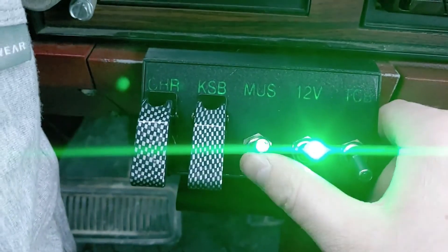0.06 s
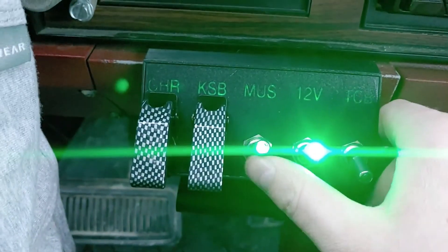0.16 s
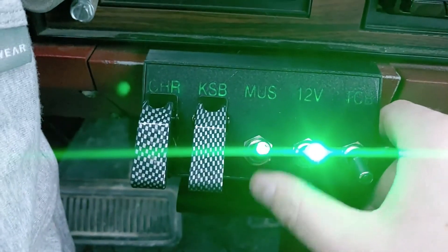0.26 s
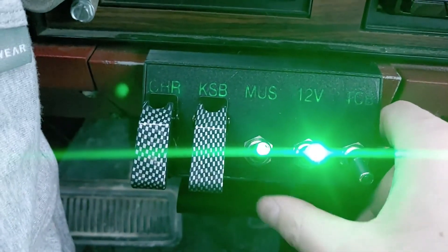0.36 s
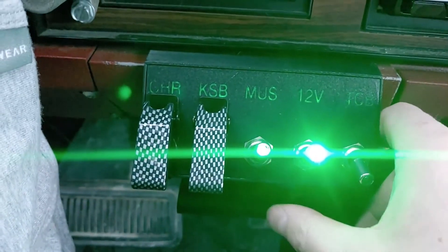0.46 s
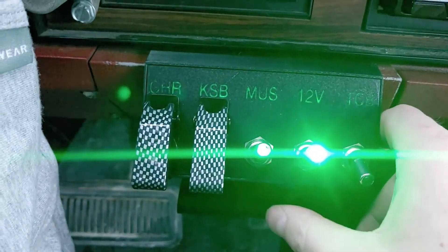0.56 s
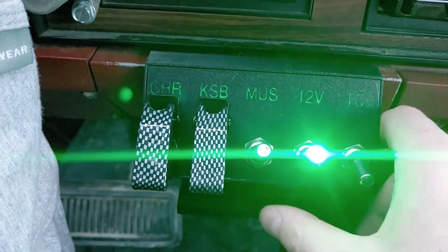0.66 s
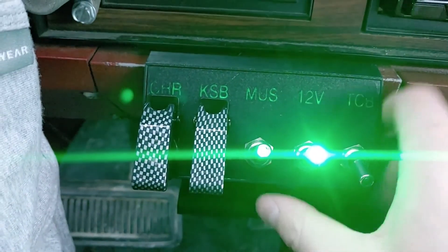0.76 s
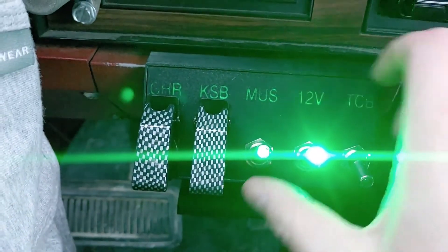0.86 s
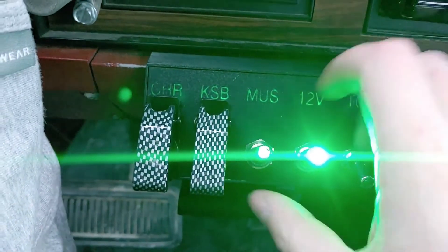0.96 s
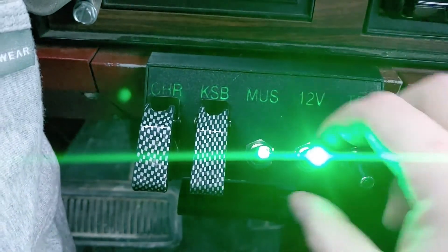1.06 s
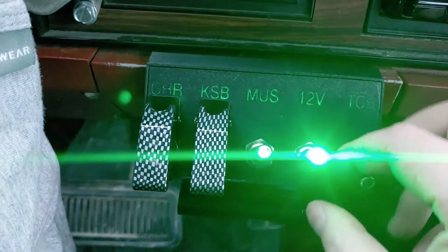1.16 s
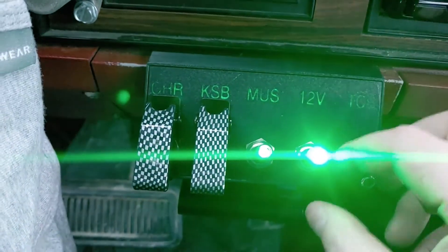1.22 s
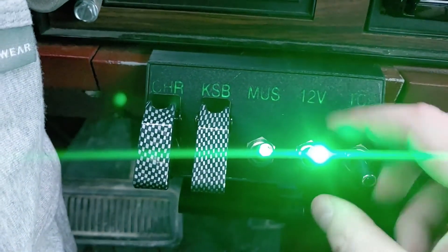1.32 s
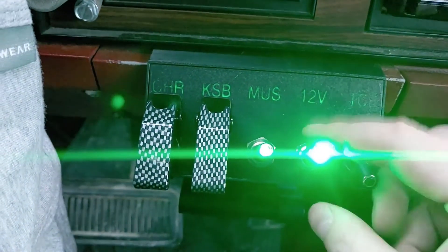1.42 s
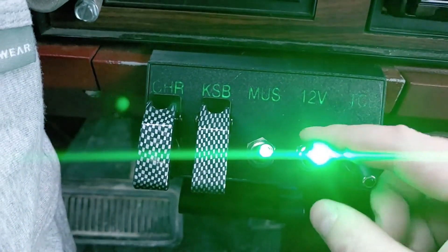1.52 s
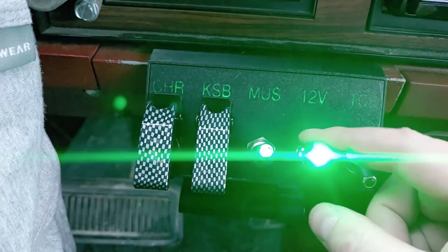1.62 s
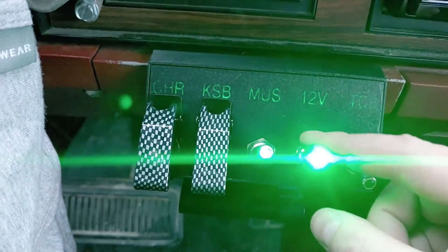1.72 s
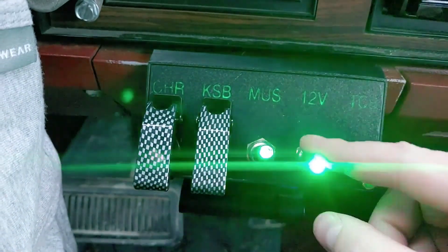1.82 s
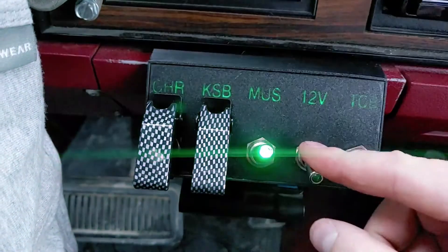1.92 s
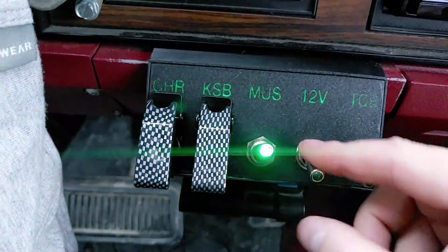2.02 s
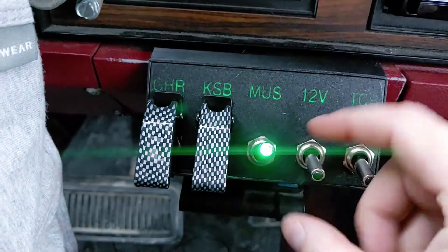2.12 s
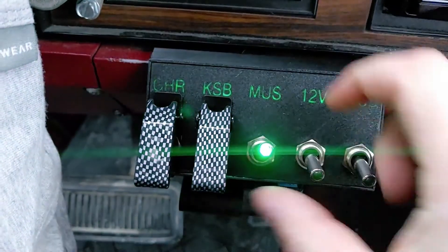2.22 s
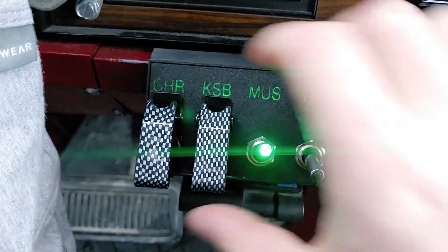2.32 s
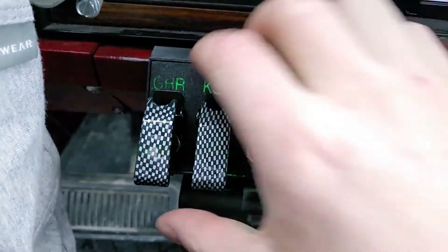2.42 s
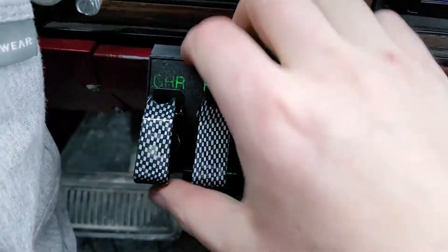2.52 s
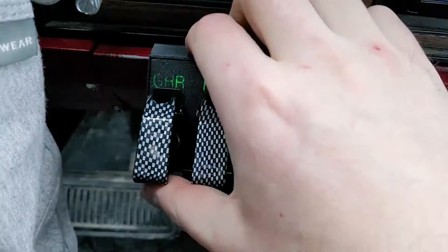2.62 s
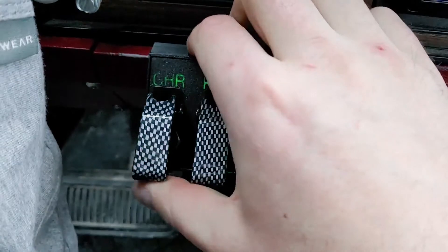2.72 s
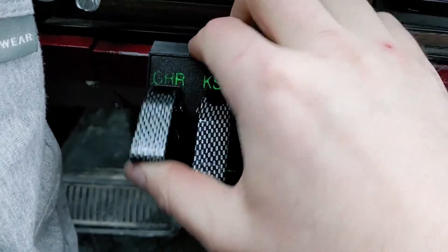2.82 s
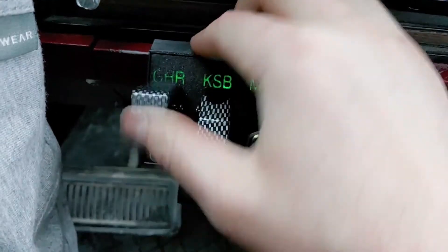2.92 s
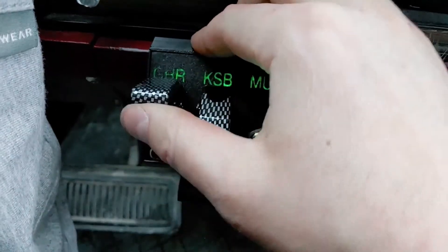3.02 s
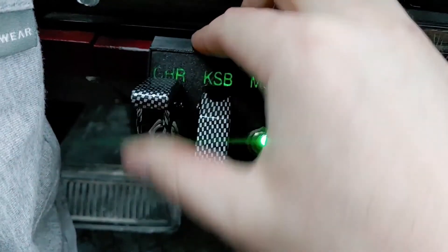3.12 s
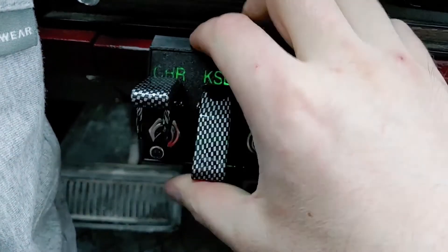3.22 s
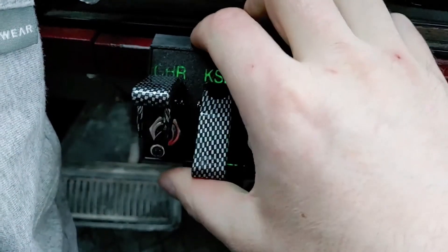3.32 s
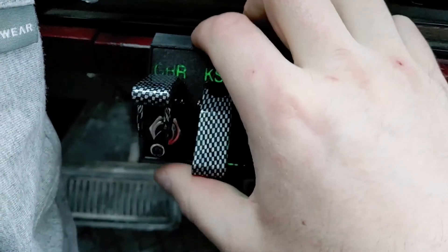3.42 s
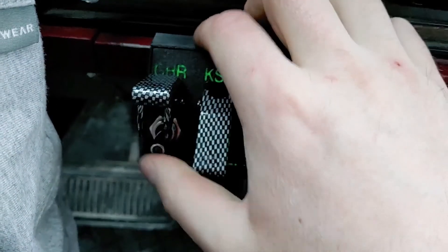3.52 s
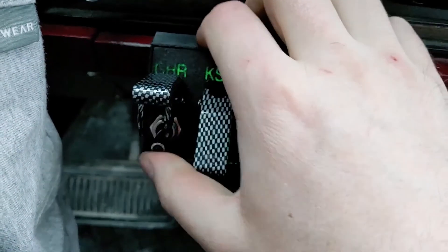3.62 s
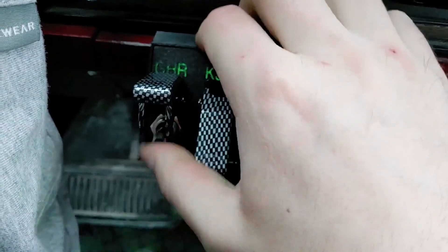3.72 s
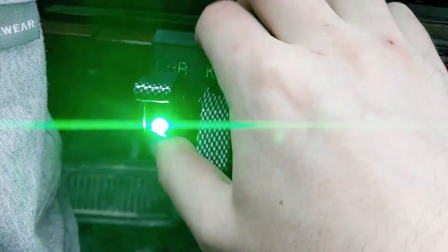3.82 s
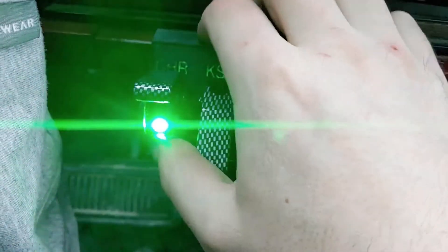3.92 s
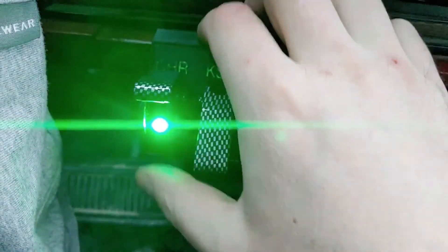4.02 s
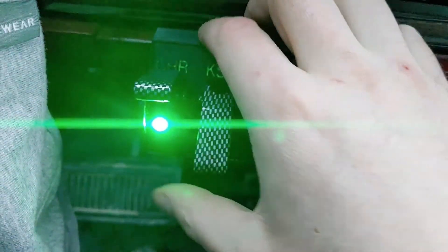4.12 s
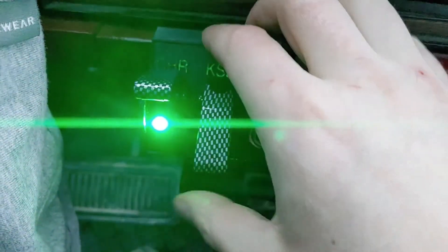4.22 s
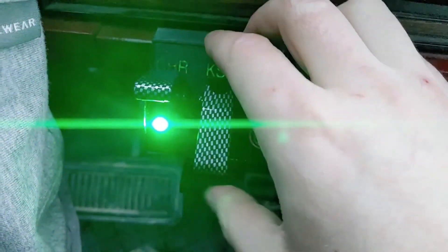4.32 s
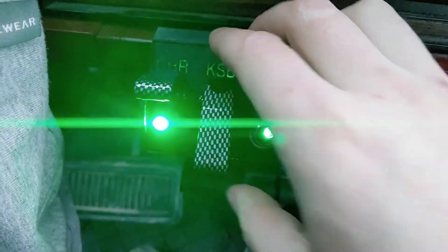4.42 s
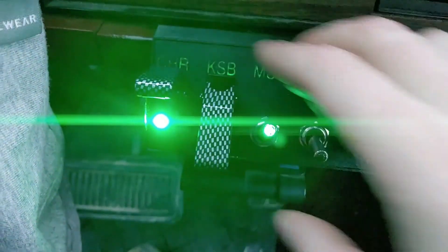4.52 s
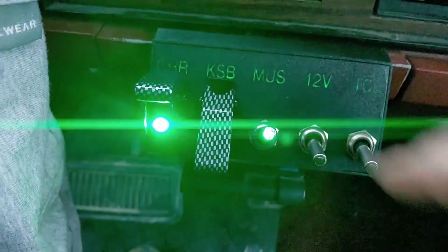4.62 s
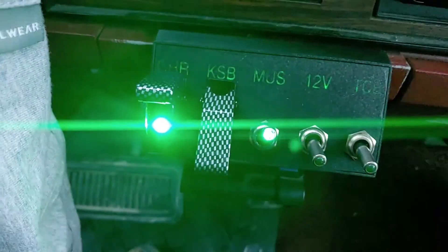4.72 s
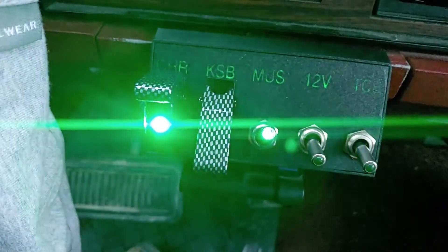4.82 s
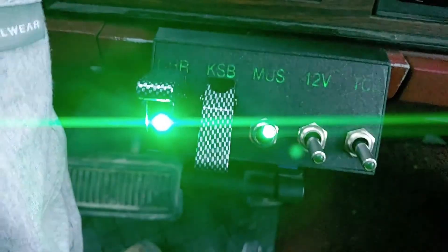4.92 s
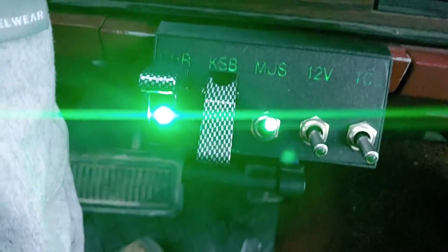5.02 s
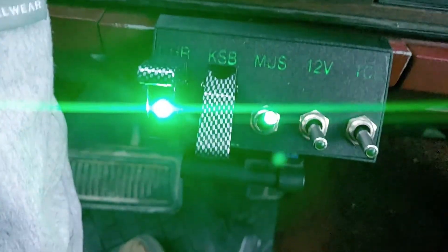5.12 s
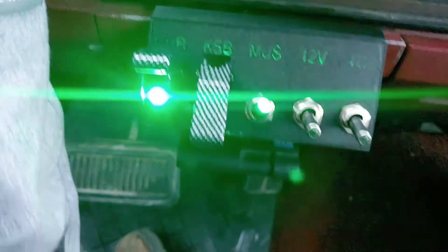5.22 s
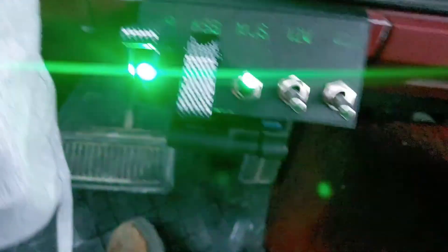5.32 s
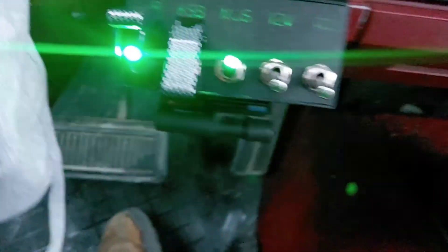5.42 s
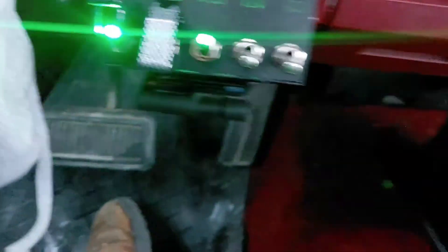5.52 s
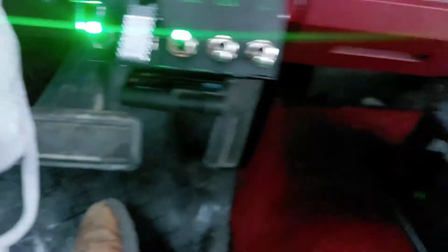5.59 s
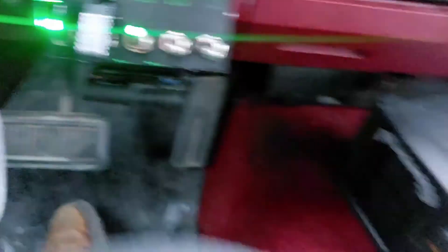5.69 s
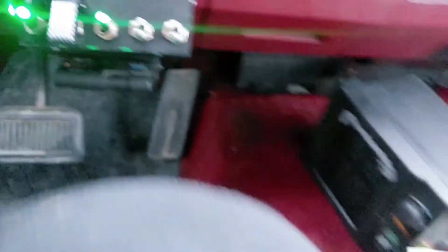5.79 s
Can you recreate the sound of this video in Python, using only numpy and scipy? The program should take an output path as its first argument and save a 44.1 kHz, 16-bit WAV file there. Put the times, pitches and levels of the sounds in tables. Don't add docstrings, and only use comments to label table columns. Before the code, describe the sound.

Small levers click and clack inside a vehicle cab while a fan rumbles and gusty air thumps hard against the right microphone.

```python
import sys
import numpy as np
from scipy import signal
from scipy.io import wavfile
from scipy.ndimage import uniform_filter1d

SR = 44100
rng = np.random.default_rng(int(sys.argv[2]) if len(sys.argv) > 2 else 0)


def convert_level_to_amplitude(level_db):
    exponent = np.asarray(level_db, float) / 20
    return 10 ** exponent


def store_pcm(level_fs):
    pcm = np.round(np.clip(level_fs, -1, 1) * 32767).astype(np.int16)
    wavfile.write(sys.argv[1], SR, np.atleast_2d(pcm).T)


N = 258189

# start_s, peak_db, left_minus_right_db, chatter_s, tail_db
SNAPS = [
    (.0096, -14.5, 7, 0.0011, -31),
    (1.8729, -6.5, 3.5, 0.00048, -24),
    (2.9517, -16.5, 6, 0.0022, -35),
    (3.7752, -14, 8.5, 0.0049, -30.5),
]
# pitch_hz, width_hz, level_db
PANEL_MODES = [
    [(690, 1060, 4), (1304, 115, 1), (2210, 420, -16), (3000, 470, 5.5), (3700, 470, 3.5), (4280, 930, -11),
     (7340, 740, -5), (10000, 3700, 2), (11200, 730, 2.5), (13200, 590, -7)],
    [(642, 270, -12), (1226, 160, -8.5), (2090, 170, -4), (3050, 300, -1), (3430, 450, 2), (4480, 550, -3),
     (6930, 550, -10), (8080, 500, -3), (10000, 900, -2.5), (13600, 1500, -5)],
    [(552, 150, -6), (1200, 290, 5), (1770, 300, -9), (2500, 410, -13), (3260, 750, -12), (4270, 320, -6.5),
     (7000, 580, -24), (9300, 1100, -14), (11850, 700, -17), (14500, 900, -34)],
    [(700, 450, -15.5), (1210, 1000, -2), (1816, 200, -6.5), (2400, 1200, -7.5), (3420, 600, -5.5),
     (4000, 740, -6.5), (6800, 2400, -15), (9100, 2500, -4), (11600, 1100, -6), (14600, 900, -31)],
]
# pitch_hz, level_db (per Hz)
CAB_TAIL = [(410, -45.5), (700, 2.5), (2160, -1.5), (4300, -10.5), (5430, -35.5), (6340, -12),
            (9980, -23.5), (11200, -32), (13800, -18.5), (15500, -42)]
# start_s, tick_db, thump_db, thump_hz
KNOCKS = [
    (1.2231, -13, -15, 300),
    (5.2574, -14.5, -12.5, 310),
]
# start_s, level_db, centre_hz, length_s
TOUCHES = [(0.77, -49, 1220, 0.053), (0.794, -46, 2220, 0.019), (0.785, -62, 8900, 0.051),
           (1.145, -57, 11000, .011), (1.23, -46.5, 2500, 0.0081), (2.565, -51, 2780, 0.0088),
           (2.699, -46.5, 6100, 0.0007), (2.821, -68, 4400, .01), (3.547, -57, 3370, 0.0037),
           (3.805, -43, 1840, 0.019), (4.245, -68.5, 5000, 0.017), (4.484, -66, 5460, 0.046),
           (4.798, -69, 6000, 0.01), (4.989, -56, 10000, 0.0015), (5.076, -72, 6500, 0.0088),
           (5.258, -54, 2520, 0.011), (5.836, -57.5, 2400, 0.013)]
# start_s, rustle_db
SLEEVE = [(0.0, -80), (.7, -75.5), (.95, -76), (1.76, -74.5), (1.92, -79), (2.14, -80.5), (2.45, -68),
          (2.75, -76.5), (3.4, -75.5), (3.9, -78.5), (4.4, -73), (5.85, -71)]
# pitch_hz, level_db (per Hz)
RUSTLE_COLOUR = [(1500, -11), (2300, -13.5), (4600, -1.5), (6800, 2.5), (9500, 0.5), (12500, 5.5),
                 (15500, -2.5)]
# front_s, hold_s, buffeting_db, leading_eddy_peak_db
GUSTS = [(0.057, 0.014, -13.5, -3.8), (0.2743, 0.034, -18.5, -2), (0.4212, 0.026, -16, -5.5),
         (0.512, 0.063, -21, -18), (0.661, 0.05, -17, 2.5), (.7653, 0.17, -18.5, -4),
         (1.051, 0.1, -15, -2.5), (1.2374, 0.08, -17.5, -7.5), (1.4746, .02, -17, -0.2),
         (1.5454, 0.094, -16, -1.5), (1.735, .015, -14.5, 2.1), (1.799, 0.042, -19.5, 2.3),
         (1.86, .085, -23.5, -21), (2.0764, .6, -22.5, -3), (2.3619, .03, -11.5, 1.3),
         (2.7219, .03, -17.5, -2), (2.8374, .58, -18.5, -4), (3.2912, 0.08, -20, 0.8),
         (3.544, .06, -14.5, 2.8), (3.473, .6, -24, -0.5), (4.109, .05, -22.5, -4.5),
         (4.218, 0.12, -19.5, -4), (4.4083, 0.019, -14, -1.9), (4.5908, .015, -24, -2),
         (4.642, .07, -23, -8), (4.8244, 0.07, -20, -4.5), (5.052, 0.076, -17.5, -6.5),
         (5.222, .31, -21, -25), (5.4498, 0.014, -14.5, 2.5), (5.618, 0.014, -24.5, -6.5)]
# start_s, peak_db, fastest_swing_hz
EDDIES = [(.1369, -6, 229), (.69, 1.4, 186), (1.0752, 2.5, 328), (1.1103, 0.3, 323), (1.2598, -3, 165),
          (1.3046, -6, 289), (1.5843, -1.5, 208), (1.6184, -4.5, 393), (2.2894, -5, 274),
          (2.3927, -12.5, 247), (2.4636, -6.5, 201), (2.5557, 0.7, 110), (2.7385, -4.5, 326),
          (2.9296, -1.5, 203), (3.0159, -6.5, 255), (3.0526, -0.9, 308), (3.0889, .1, 203),
          (3.1326, -5.5, 195), (3.1466, .6, 194), (3.1994, -2, 177), (5.2839, 1.2, 168),
          (1.9083, -0.5, 240), (3.3735, -2.5, 218), (3.7087, -3, 238), (3.5794, 3, 239), (3.5974, -1, 288),
          (3.9196, -3, 172), (4.2427, 1, 155), (5.361, -7.5, 397), (5.4971, -2.1, 272)]
# pitch_hz, level_db (per Hz)
DRAUGHT_COLOUR = [(15, -43), (25, -3.5), (65, 8.5), (233, -6), (319, -14.5), (415, -23.5), (532, -25.5),
                  (1180, -59.5), (1300, -60), (1690, -76), (2860, -120)]
# pitch_hz, left_db (per Hz), right_db (per Hz)
BLOWER_COLOUR = [(33, -63, -64), (52, -66.5, -59), (70, -52.5, -53), (112, -58, -45), (197, -66, -65.5),
                 (316, -65, -65), (404, -69, -69.5), (590, -69.5, -73.5), (705, -76.5, -75.5),
                 (1350, -81, -78.5), (2400, -83.5, -89.5), (3640, -91.5, -95), (5000, -101, -103),
                 (7000, -109, -109)]
# pitch_hz, likeness (-1 to 1)
BLOWER_LIKENESS = [(60, 1), (640, 0.76), (1400, -0.58), (3100, 0.1), (7000, -0.15)]
# start_s, level_db
RUMBLE = [(0.0, -31.5), (1.4, -33), (2.4, -35), (3.55, -31.5), (4.1, -36.5), (5.0, -35), (5.85, -39.5)]
# pitch_hz, width_hz, level_db
CAB_MODES = [(84, 14, 4), (150, 47, -4.5), (229.7, 27, 8), (415, 34, 1.5), (476.6, 120, -1.5)]
# pitch_hz, level_db
WHINE = [(2455, -78.5), (3677, -79.5)]
# pitch_hz, width_hz, share_added (ratio, below zero is a dip)
PORT_COLOUR = [
    [(6570, 380, 0.92), (7770, 860, -1.2), (11300, 2900, -1.2), (12400, 700, 0.41)],
    [(6860, 550, 0.45), (7460, 600, -.3), (10850, 4600, -1.2), (12100, 780, 0.5)],
]


def snaps():
    out = np.zeros((2, N))
    t = np.arange(-180, 6000) / SR
    after_s = np.maximum(t, 0)
    t60 = 0.073
    for (s, peak_db, pan_db, chatter_s, tail_db), modes in zip(SNAPS, PANEL_MODES):
        ring, after = np.zeros((2, 2, len(t)))
        for hz, width_hz, mode_db in modes:
            contact = lever_contact(t, hz, chatter_s)
            mode = resonance(contact, hz, width_hz)
            ring += convert_level_to_amplitude(mode_db) * mode / np.abs(mode).max(axis=1, keepdims=True)
            hum = rms_one(resonance(rng.standard_normal((2, len(t))), hz, 0.53 * width_hz))
            after += convert_level_to_amplitude(0.77 * mode_db - 6 - 12 * hz / 3900 * after_s / t60) * hum
        tail = 0
        for hz, band in bands(rng.standard_normal((2, 2, len(t))), 592, count=14):
            band_db = at_hz(CAB_TAIL, hz) - 3.5 - 25 * hz / 19000 * after_s / t60
            tail = tail + convert_level_to_amplitude(band_db) * band / band.std() * np.sqrt(hz / 2000)
        build_up = 1 - np.exp(-after_s / 0.0052)
        tail = (tail + after) * build_up * convert_level_to_amplitude(tail_db - 60 * (after_s / t60) ** 1.28)
        add(out, sides(pan_db) * (convert_level_to_amplitude(peak_db) * ring + tail), s + t[0])
    return out


def lever_contact(t, hz, chatter_s):
    turn, shift = rng.random(2)
    shake = np.sin(2 * np.pi * (hz * t + turn - np.array([[0], [0.5 * shift]])))
    shared, left, right = rng.standard_normal((3, len(t)))
    rough = shake + 2 * (shared + 0.5 * np.array([left, right]))
    slip = 0.006 * np.exp(t / 0.0012) * (t < 0)
    late = np.maximum(t - min(2600 / hz ** 2, 0.0018), 0) / (chatter_s + 1.12 / hz)
    contact = rough * (slip + late * np.exp(-late * 3.74))
    return contact + 0.2 * np.roll(contact, round(0.0033 * SR), axis=1)


def knocks():
    out = np.zeros(N)
    t = np.arange(1300) / SR
    for s, tick_db, thump_db, thump_hz in KNOCKS:
        from_peak = t - 0.0006
        tick = np.cos(2 * np.pi * 2400 * from_peak) * np.exp(-(from_peak / 0.00028) ** 2)
        grit = 0.12 * rng.standard_normal(len(t)) * np.exp(-t / 0.0056)
        shell = resonance(tick + grit, 1700, 1800)
        add(out, convert_level_to_amplitude(tick_db) * (tick + 0.32 * shell), s - 0.0003)
        push = (t / 0.0011) ** 2 * np.exp(-t / 0.0006)
        push += 0.15 * np.minimum(t / 0.001, 1) * np.exp(-t / 0.003)
        slowing_swing = np.sin(2 * np.pi * thump_hz * np.sqrt(t * 0.0045))
        add(out, -convert_level_to_amplitude(thump_db + 10.5) * slowing_swing * push, s)
    return out * [[1], [0.04]]


def touches():
    out = np.zeros((2, N))
    t = np.arange(-2200, 2200) / SR
    for s, level_db, hz, length_s in TOUCHES:
        white = rng.standard_normal((2, len(t)))
        broad = rms_one(resonance(resonance(white, hz, 1.2 * hz), hz, 0.65 * hz))
        pitched = rms_one(resonance(white, hz, 0.054 * hz))
        swell = np.exp(-0.5 * (t / length_s) ** 2)
        add(out, convert_level_to_amplitude(level_db) * sides(3.7) * (broad + 0.5 * pitched) * swell, s + t[0])
    return out


def gusts():
    rise_db_per_s, fall_db_per_s, lull_db = 439, 402.5, -52
    t = np.arange(N) / SR
    power = convert_level_to_amplitude(2 * lull_db)
    for s, hold_s, level_db, _ in GUSTS:
        away_db = rise_db_per_s * np.maximum(s - t, 0) + fall_db_per_s * np.maximum(t - s - hold_s, 0)
        power = power + convert_level_to_amplitude(2 * (level_db - away_db))
    return 10 * np.log10(power)


def buffeting(brighten, lumpy_db):
    gust_db = gusts()
    swing_db = gust_db - gust_db.mean() + lumpy_db * np.minimum(drift(21), 1.1)
    out = 0
    for hz, band in bands(rng.standard_normal((2, N)), 21.2, count=18):
        extra_db = brighten * np.log2(hz / 90) * swing_db + 2.8 * drift(27)
        out = out + convert_level_to_amplitude(at_hz(DRAUGHT_COLOUR, hz) + extra_db) * band
    out = out / np.sqrt(uniform_filter1d(out ** 2, size=6000) + 1e-20)
    return convert_level_to_amplitude(gust_db.mean() + swing_db + 3) * out


def eddies():
    out = np.zeros(N)
    t = np.arange(-400, 2200) / SR
    leading = [(s, peak_db, 250 + 17 * peak_db) for s, _, _, peak_db in GUSTS]
    for s, peak_db, first_hz in EDDIES + leading:
        settle_s = 0.0064 + 0.0046 * rng.random()
        speed = 0.68 * np.exp(-np.abs(t) / settle_s) + 0.59 * np.exp(-(t / 0.0008) ** 2)
        turns = np.cumsum(65 + first_hz * speed) / SR
        swing = -np.sin(2 * np.pi * (turns - turns[400]))
        push = np.where(t < 0, np.exp(-(t / 0.0021) ** 2), np.exp(-t / 0.012))
        fade = np.minimum(1, (t[-1] - t) / 0.01)
        add(out, convert_level_to_amplitude(peak_db - 5) * swing * push * fade, s + t[0])
    return out


def rustle(rustle_db):
    cloth = 0
    for hz, band in bands(rng.standard_normal((2, 2, N)), 1600, count=10):
        cloth = cloth + convert_level_to_amplitude(at_hz(RUSTLE_COLOUR, hz) + 2.1 * drift(15)) * band
    treble = signal.butter(2, 8000, "high", fs=SR, output="sos")
    hiss = signal.sosfilt(treble, rng.standard_normal((2, N)))
    return convert_level_to_amplitude(rustle_db + 6) * rms_one(cloth) + convert_level_to_amplitude(-77.5) * hiss


def blower_level():
    before_db, after_db, drop_length_s = -52, -57, 0.095
    off_s = SNAPS[1][0]
    return np.interp(np.arange(N) / SR, [off_s, off_s + drop_length_s], [before_db, after_db])


def blower(blower_db, patchy_db):
    out = 0
    (rumble_db,) = in_time(RUMBLE)
    for hz, (mid, side) in bands(rng.standard_normal((2, 2, N)), 27.48, count=25):
        alike = at_hz(BLOWER_LIKENESS, hz)
        level_db = rumble_db + 71.5 if hz < 700 else blower_db + 93.5
        patches_db = patchy_db * min(1, 700 / hz) * drift(17.2)
        port_db = np.array([[at_hz(BLOWER_COLOUR, hz)], [at_hz(BLOWER_COLOUR, hz, column=2)]])
        both = np.sqrt(1 + alike) * mid + np.sqrt(1 - alike) * side * [[1], [-1]]
        out = out + convert_level_to_amplitude(port_db + level_db + patches_db) * both
    return out + sum(convert_level_to_amplitude(db) * resonance(out, hz, width_hz) for hz, width_hz, db in CAB_MODES)


def whine():
    on_s, off_s = 3.8, 5.5
    t = np.arange(N) / SR
    running = np.interp(t, [on_s, on_s + 0.11, off_s - 0.3, off_s], [0, 1, 1, 0])
    tones = sum(convert_level_to_amplitude(db + 9) * np.sin(2 * np.pi * hz * t) for hz, db in WHINE)
    return running * tones * sides(4)


def rms_one(x):
    return x / np.sqrt(np.mean(x ** 2) + 1e-20)


def in_time(rows):
    s, *columns = np.transpose(rows)
    return [np.interp(np.arange(N) / SR, s, c) for c in columns]


def at_hz(points, hz, column=1):
    points = np.array(points)
    return np.interp(np.log(hz), np.log(points[:, 0]), points[:, column])


def drift(rate_hz):
    r = np.exp(-2 * np.pi * rate_hz * 40 / SR)
    white = rng.standard_normal(N // 40 + 2002)
    slow = signal.lfilter([1], [1, -2 * r, r * r], white)[2000:]
    return np.interp(np.arange(N) / 40, np.arange(len(slow)), rms_one(slow))


def bands(white, low_hz, count):
    edges = low_hz * 2 ** (np.arange(count + 1) / 3)
    for k, (low, high) in enumerate(zip(edges, edges[1:])):
        slice_filter = signal.butter(2, [low, high], "band", fs=SR, output="sos")
        yield np.sqrt(low * high), signal.sosfilt(slice_filter, white[k % 2])


def resonance(x, hz, width_hz):
    r = np.exp(-np.pi * width_hz / SR)
    poles = [1, -2 * r * np.cos(2 * np.pi * hz / SR), r * r]
    return signal.lfilter([(1 - r * r) / 2, 0, (r * r - 1) / 2], poles, x)


def add(out, x, s):
    i = max(round(s * SR), 0)
    out[..., i:i + x.shape[-1]] += x[..., :N - i]


def sides(left_right_db):
    return convert_level_to_amplitude(np.array([[0.5], [-0.5]]) * left_right_db)


def scene():
    draught = buffeting(brighten=0.071, lumpy_db=4.5) + eddies()
    (rustle_db,) = in_time(SLEEVE)
    cab = blower(blower_level(), patchy_db=2.5) + rustle(rustle_db) + whine()
    panel = snaps() + touches() + knocks()
    return panel + cab + draught * [[0], [1]]


def band_limit(x):
    return signal.sosfilt(signal.butter(12, 16460, fs=SR, output="sos"), x)


def record(dry):
    x = dry.copy()
    for port, colour in enumerate(PORT_COLOUR):
        for hz, width_hz, share in colour:
            x[port] += np.clip(share, -1, 2) * resonance(x[port], hz, width_hz)
    x = 0.94 * x / (1 + np.abs(x) ** 6) ** (1 / 6)
    top_cut = signal.cheby2(12, 60, 16400, fs=SR, output="sos")
    mix = signal.sosfilt(top_cut, x)
    return band_limit(mix)


dry = scene()
out = record(dry)
store_pcm(out)
```